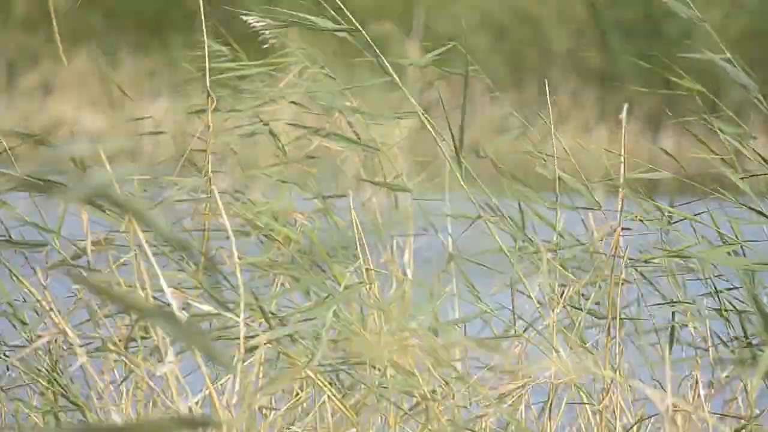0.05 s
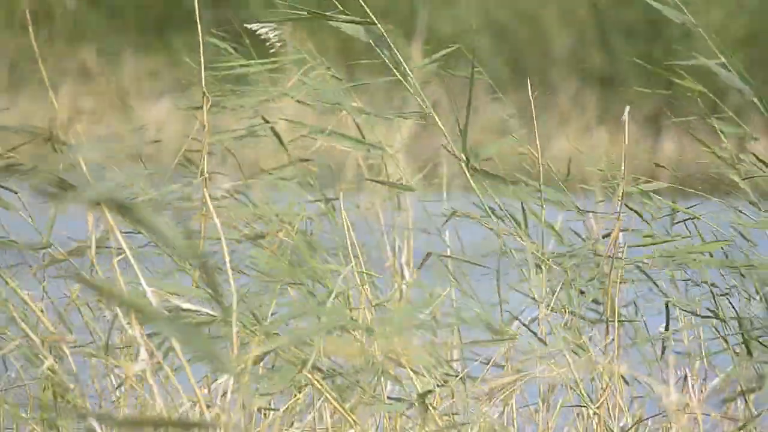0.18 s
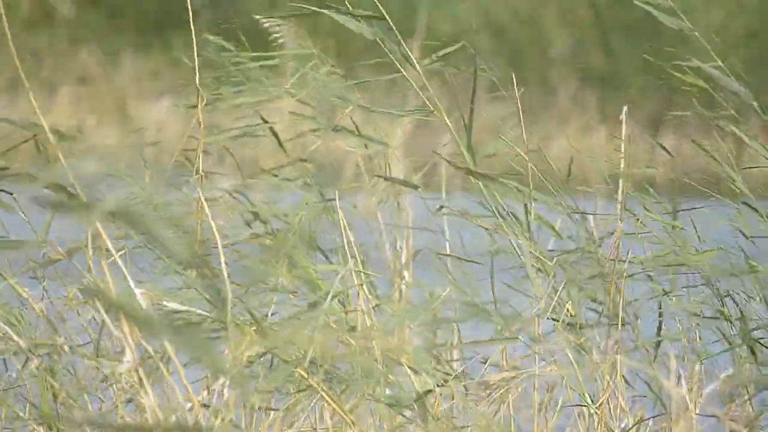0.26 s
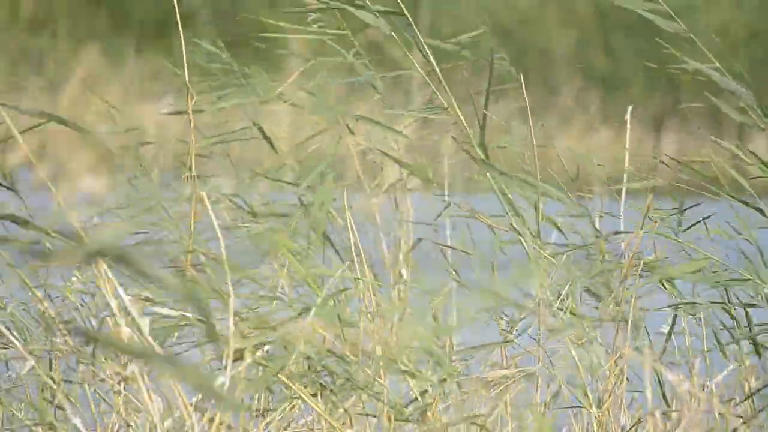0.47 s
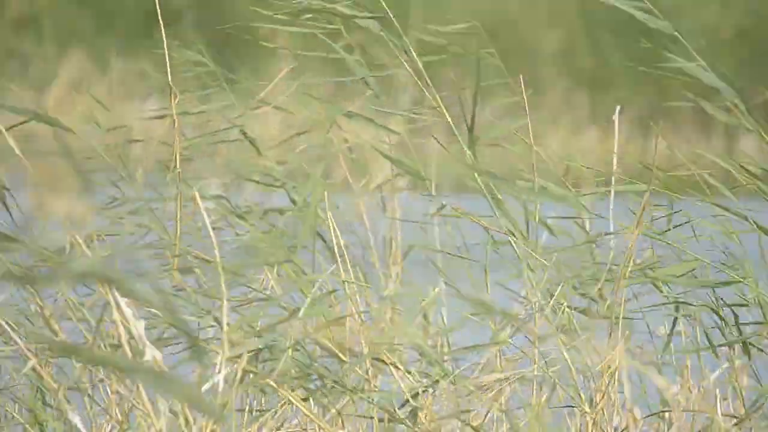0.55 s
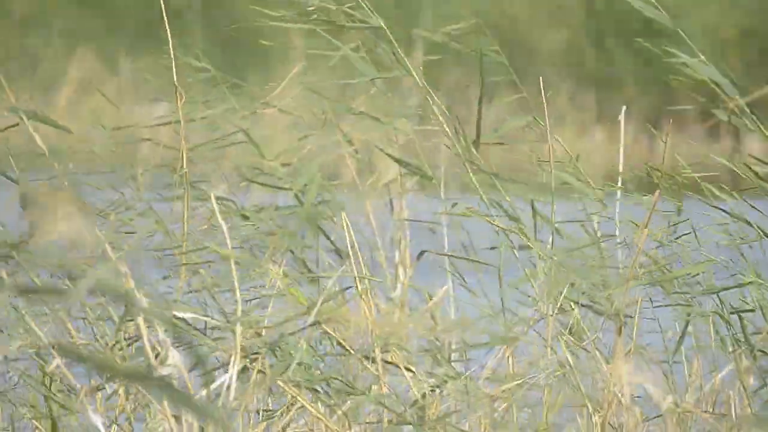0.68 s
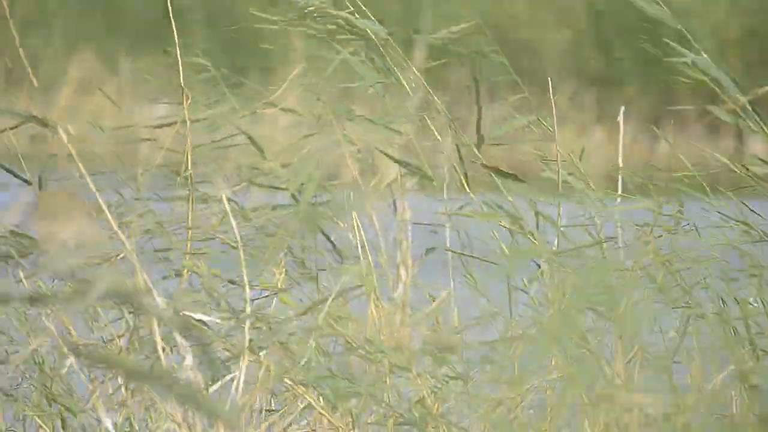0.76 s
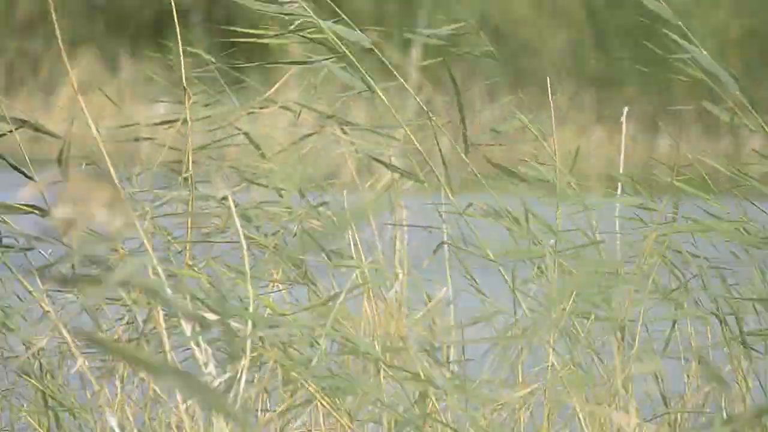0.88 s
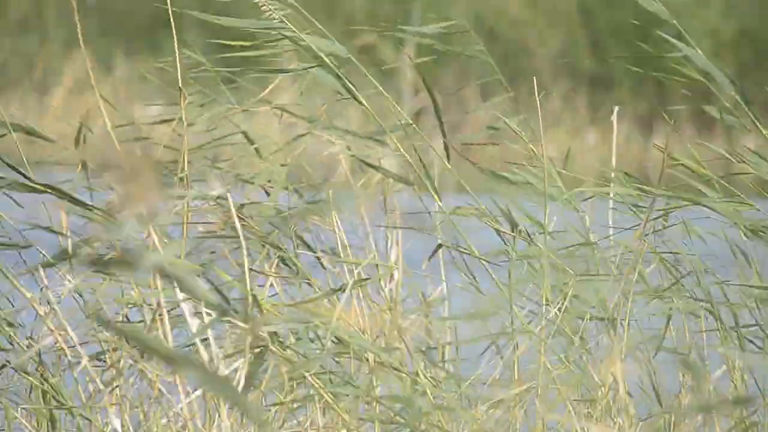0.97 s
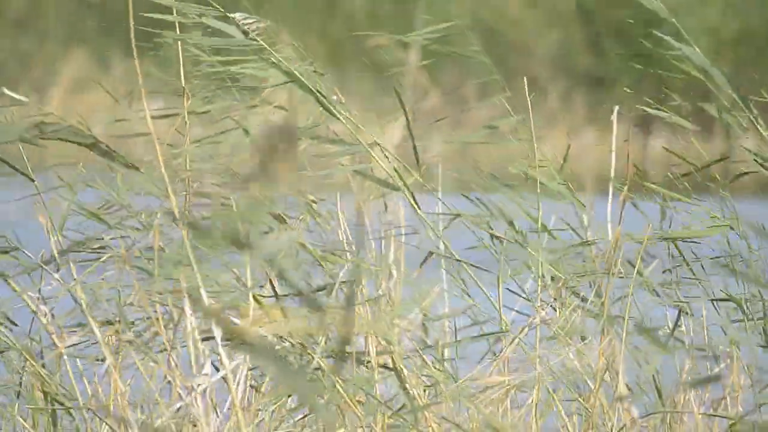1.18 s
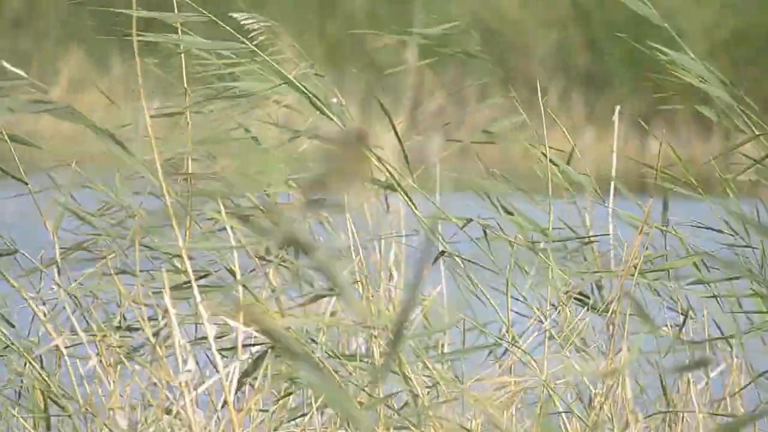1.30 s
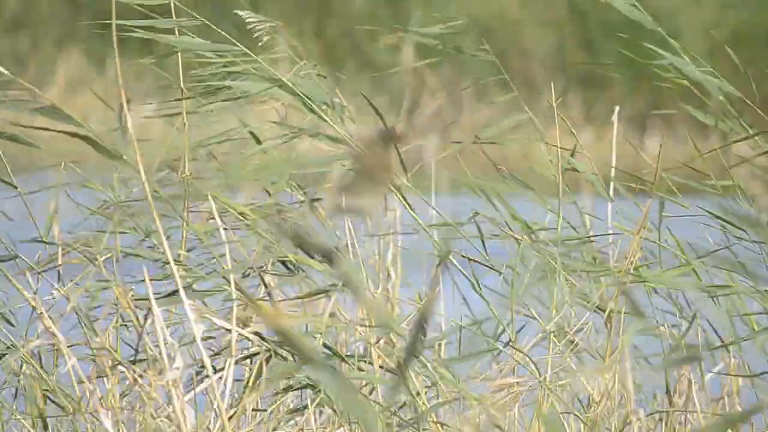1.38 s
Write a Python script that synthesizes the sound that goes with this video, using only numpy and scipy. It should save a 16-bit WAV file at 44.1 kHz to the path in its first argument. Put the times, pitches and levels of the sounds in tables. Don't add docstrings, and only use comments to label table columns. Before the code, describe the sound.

Outdoor reed bed in wind, close unshielded microphone: soft leaf hiss swells with dry swishes and flicks, low buffeting peaks early, then scattered puffs and brushes continue over a faint distant wash.

```python
import sys
import numpy as np
from scipy import signal
from scipy.io import wavfile
from scipy.ndimage import uniform_filter1d

SR = 44100
rng = np.random.default_rng(int(sys.argv[2]) if len(sys.argv) > 2 else 0)


def volts(x):
    e = np.asarray(x, float) / 20
    return 10 ** e


def log_audio(samples):
    frames = np.atleast_2d(samples).T
    limited = np.clip(frames, -1, 1)
    pcm = np.round(limited * 32767).astype(np.int16)
    wavfile.write(sys.argv[1], SR, pcm)


N = 63945

# (time [s], depth [dB], width [ms])
EDDIES = [(0.2791, -38.6, 2.3), (0.3029, -38.7, 1.4), (0.3381, -37.4, 1.0), (0.3727, -38.4, 2.8),
          (0.3772, -39.4, 1.0), (0.4264, -35.5, 1.8), (0.4921, -32.3, 1.8), (0.504, -19.3, 1.15),
          (0.5097, -27.3, 2.5), (0.5185, -26.3, 2.4), (0.5261, -30.1, 1.5), (0.5346, -30.3, 1.1),
          (0.5377, -32.6, 1.9), (0.5442, -30.6, 1.7), (0.5522, -28.5, 2.7), (0.5579, -27, 1.2),
          (0.56, -27, 0.9), (0.5606, -29, 2.0), (0.5635, -39, 1.0), (0.5668, -35, 3.2),
          (0.8084, -39.6, 2.1), (0.828, -36, 2.2), (0.9363, -42, 1.0), (0.9389, -31, 1.2),
          (0.944, -33.9, 2.0), (1.0018, -33, 2.6), (1.0404, -33, 1.6), (1.0682, -32.5, 2.7),
          (1.107, -39.1, 3.2), (1.266, -33, 1.5), (1.2719, -37, 1.9), (1.2829, -34, 1.6),
          (.1481, -45, 2.2), (.1723, -42, 4.5), (.1836, -44.5, 3.2), (.224, -42, 1.9),
                 (.2311, -40.3, 2.5), (.245, -43, 1.7), (.2514, -43.5, 1.3), (.259, -41.5, 1.6),
                 (.2624, -40.5, 2.5), (.291, -41.6, 3.8), (.3409, -45, 1.3), (.3451, -46, 1.3),
                 (.3501, -44.3, 1.5), (.3945, -41.5, 1.8), (.4223, -40, 2.2), (.4333, -43.3, 2.8),
                 (.464, -40.5, 1.5), (.4672, -41.3, 1.4), (.4729, -41, 2.4), (.48, -35.8, 3.2),
                 (.4874, -39, 2.2), (.4981, -38, 2.4), (.5135, -36, 1.8), (.532, -37.4, 1.0),
                 (.5413, -39, 1.5), (.5758, -40, 1.1), (.581, -36, 2.2), (.584, -42.7, 1.6),
                 (.6696, -45, 1.3), (.6732, -42, 2.8), (.6819, -42.7, 3.4), (.7956, -44, 2.8),
                 (.8231, -43, 2.4), (.8369, -43.5, 2.6), (.8917, -40, 2.1), (.9483, -39, 3.0),
                 (1.0283, -40.2, 2.4), (1.0345, -43.3, 1.9), (1.0451, -42.6, 1.8), (1.0584, -43, 2.3),
                 (1.1129, -41.6, 3.3), (1.1373, -42, 1.2), (1.1422, -44, 2.8), (1.1591, -42.5, 3.0),
                 (1.1777, -41.7, 1.7), (1.1823, -43.8, 1.0), (1.2264, -43, 2.9), (1.2689, -39, 1.3),
                 (1.2766, -38, 1.9), (1.2797, -42, 1.4), (1.2863, -38.4, 3.0), (1.3193, -47, 3.3),
                 (1.3687, -45, 5), (1.3844, -41.6, 2.0), (1.4, -42.2, 1.7), (1.4178, -44.6, 3.5)]
# (time [s], level [dB])
GUST = [(0.0, -62), (0.07, -66), (0.14, -63.5), (0.2, -51), (0.33, -50), (0.416, -51), (0.6, -54.5),
        (0.72, -57), (0.81, -54.5), (0.9, -56.5), (1.106, -54.5), (1.45, -55)]
# (time [s], level [dB], half length [s], flutter pitch [Hz])
SURGES = [(.015, -56, 0.013, 190), (0.076, -47.5, 0.0071, 202), (.162, -45.5, 0.0084, 112),
          (.232, -52, 0.014, 174), (0.261, -46, 0.027, 148), (0.296, -49.5, 0.027, 224),
          (.466, -48.5, 0.0073, 298), (.482, -46, 0.0087, 158), (.515, -32, 0.0049, 200),
          (.553, -29.5, 0.0068, 142), (.552, -43.5, 0.0025, 800), (0.579, -39, 0.0027, 205),
          (.6, -58, 0.012, 106), (0.673, -52, 0.004, 183), (.63, -50, 0.011, 120), (.793, -61, 0.0062, 182),
          (0.889, -48, 0.0049, 132), (.949, -50, 0.0039, 202), (.975, -59, 0.0065, 100),
          (1.032, -42.5, 0.0094, 261), (1.062, -57, 0.0027, 144), (1.138, -47.5, 0.0033, 250),
          (1.159, -49, 0.0078, 170), (1.181, -45, 0.0025, 292), (1.227, -43.5, 0.0027, 162),
          (1.278, -41, 0.0073, 297), (1.32, -45, 0.0029, 133), (1.365, -59, 0.018, 81),
          (1.391, -48, 0.016, 266), (1.423, -49, 0.0091, 172)]
# (time [s], level [dB], centre [Hz])
SWISHES = [(0.041, -58, 3750), (0.082, -71, 6200.0), (0.153, -53, 7000), (0.184, -50, 4700),
           (0.257, -49.5, 5530), (0.29, -46, 6160), (0.31, -47.5, 4180), (0.337, -45.5, 4060),
           (0.366, -43.5, 5500), (0.413, -51, 4300.0), (0.431, -60, 5070), (0.516, -44, 5840),
           (0.583, -45, 5170), (0.647, -50, 3960), (0.691, -57, 5300.0), (0.751, -47.5, 4680),
           (0.778, -51.5, 4000), (0.797, -55, 2300), (0.829, -50, 4900), (0.914, -55.5, 5100.0),
           (0.973, -55, 4200.0), (1.013, -52.5, 3470), (1.071, -52, 4350), (1.084, -52.5, 3600),
           (1.133, -48, 5370), (1.187, -49, 4530), (1.203, -50, 4800), (1.282, -59, 6140),
           (1.346, -61, 5100.0), (1.424, -50, 2400)]
# (time [s], level [dB], centre [Hz])
FLICKS = [(.081, -50.5, 10700), (.154, -50.5, 10000), (0.221, -48, 10600), (.254, -48, 9500),
          (.262, -43, 9850), (.29, -43, 11000), (0.363, -46, 9500), (.374, -43, 10800), (.381, -47, 9300),
          (.414, -48, 4370), (.43, -46.5, 6940), (.442, -61, 7160), (.485, -48, 2360), (.647, -56, 4080),
          (0.859, -49, 10000), (1.084, -50, 2260), (1.133, -52, 5800), (1.189, -50.5, 2860),
          (1.19, -52.5, 5830), (1.201, -56, 2960), (1.212, -53, 5170), (1.132, -56, 2460),
          (.483, -48, 7100), (.485, -54.5, 3660), (.492, -49.5, 5670), (0.236, -51, 6600), (.31, -60, 9500),
          (.395, -50, 10000), (0.464, -66, 5800), (.508, -47.5, 9800), (.617, -50, 9600),
          (0.339, -52.5, 2570), (.778, -54, 5700), (.828, -58, 6800), (1.084, -56, 5700),
          (1.205, -53, 5600), (1.28, -54, 9300)]
# (time [s], level [dB])
SWAY = [
    (0.0, -55),
    (0.152, -53.5),
    (0.25, -47.5),
    (0.402, -47),
    (0.476, -45),
    (0.836, -51),
    (1.45, -52),
]
# (frequency [Hz], level per Hz [dB])
LEAF_COLOUR = [
    (600, -3.5),
    (1170, -3),
    (2600, 3.5),
    (4500, -0.5),
    (7100, 1.5),
    (9100, 1),
    (11000, 1.5),
    (13000, -0.5),
]


def rms_one(x):
    return x / np.sqrt(np.mean(x ** 2) + 1e-20)


def in_time(rows):
    s, db = np.transpose(rows)
    return np.interp(np.arange(N) / SR, s, db)


def band(x, low_hz, high_hz):
    edges = [low_hz, min(high_hz, 0.45 * SR)]
    return signal.sosfilt(signal.butter(2, edges, "band", fs=SR, output="sos"), x)


def drift(rate_hz):
    r = np.exp(-80 * np.pi * rate_hz / SR)
    noise = rng.standard_normal(N // 40 + 2002)
    slow = signal.lfilter([1], [1, -2 * r, r * r], noise)[2000:]
    return np.interp(np.arange(N) / 40, np.arange(len(slow)), rms_one(slow))


def grains(per_s, spread_db):
    size = volts(spread_db * np.minimum(rng.exponential(1, N), 4))
    return size * (rng.random(N) < per_s / SR)


def eddy(width_ms):
    u = np.arange(-400, 401) / SR * 1000 / width_ms
    core = 1 / np.cosh(2.31 * u)
    rise = np.exp(-0.5 * (u / 0.96) ** 2)
    shape = rise * core.sum() / rise.sum() - core
    return shape / -shape.min()


def vent(x):
    w, damping = 2 * np.pi * 55, 0.8
    return signal.lfilter(*signal.bilinear([1, 0, 0], [1, 2 * damping * w, w * w], SR), x)


def buffeting():
    strong = np.zeros(N + 801)
    for s, db, width_ms in EDDIES:
        start = int(s * SR)
        strong[start:start + 801] += volts(db + 1.52) * eddy(width_ms)
    small_per_s, small_ms = 500, 1.58
    small = 0
    for size in (0.6, 1.05, 1.7):
        small = small + signal.fftconvolve(grains(small_per_s / 3, 1.5), eddy(small_ms * size), "same")
    rumble = volts(-7) * rms_one(band(rng.standard_normal(N), 37.7, 81))
    return vent(strong[400:N + 400]) + volts(in_time(GUST)) * (rms_one(vent(small)) + rumble)


def surges():
    octaves, surge_db = 0.61, -4.5
    spray_db, full_spray_db = -14.5, -41.5
    out = np.zeros(N + 8000)
    t = np.arange(-4000, 4000) / SR
    for s, db, half_s, hz in SURGES:
        low, high = rng.standard_normal((2, len(t)))
        edges = hz / 2 ** octaves, hz * 2 ** octaves
        flutter = band(band(low, *edges), *edges)
        flutter = flutter / np.sqrt(uniform_filter1d(flutter ** 2, size=400) + 1e-12)
        spray = volts(spray_db + min(db - full_spray_db, 0)) * rms_one(band(high, 493, 1000))
        swell = np.exp(-0.5 * (t / half_s) ** 2)
        start = int(s * SR)
        out[start:start + len(t)] += volts(db + surge_db) * swell * (flutter + spray)
    return out[4000:N + 4000]


def swishes():
    rise_s, fall_s, grain_db, swish_db = 0.0031, 0.0025, 3, 1.0
    out = np.zeros(N + 2000)
    t = np.arange(-1000, 1000) / SR
    swell = np.exp(-0.5 * (t / np.where(t < 0, rise_s, fall_s)) ** 2)
    for rows, octaves in ((SWISHES, 0.9), (FLICKS, 0.18)):
        for s, db, hz in rows:
            noise, lumps = rng.standard_normal((2, len(t)))
            crackle = noise * volts(grain_db * rms_one(uniform_filter1d(lumps, size=30)))
            burst = swell * band(crackle, hz / 2 ** octaves, hz * 2 ** octaves)
            burst = burst * np.sqrt(np.sum(swell ** 2) / np.sum(burst ** 2))
            start = int(s * SR)
            out[start:start + len(t)] += volts(db + swish_db) * burst
    return out[1000:N + 1000]


def leaf_db(hz):
    points, db = np.transpose(LEAF_COLOUR)
    return np.interp(np.log(hz), np.log(points), db)


def leaf_hiss(together_db, own_db):
    edges = 560 * 2 ** (np.arange(15) / 3)
    white = rng.standard_normal((2, N))
    together = drift(19.3)
    out = 0
    for k, (low, high) in enumerate(zip(edges, edges[1:])):
        flicker_db = together_db * together + own_db * drift(10.5)
        level = volts(leaf_db(np.sqrt(low * high)) + flicker_db)
        out = out + level * band(white[k % 2], low, high)
    return rms_one(out)


def leaf_ticks():
    ticks_per_s, ring_cycles = 2500, 4.9
    clicks = grains(ticks_per_s * volts(6 * drift(30)), 3) * rng.choice([-1, 1], N)
    dealt = rng.integers(0, 20, N)
    out = 0
    for k, hz in enumerate(np.geomspace(1800, 10500, 20)):
        r = volts(-60 * hz / (ring_cycles * SR))
        w = 2 * np.pi * hz / SR
        struck = clicks * (dealt == k) + 1e-18
        ring = signal.lfilter([0, np.sin(w)], [1, -2 * r * np.cos(w), r * r], struck)
        out = out + volts(leaf_db(hz)) * np.sqrt(hz) * ring
    return rms_one(out)


def reeds():
    return volts(in_time(SWAY)) * (leaf_hiss(together_db=1.1, own_db=1.8) + volts(-6) * leaf_ticks())


def far_wash():
    sway_db = in_time(SWAY)
    level_db = -60 + 0.27 * (sway_db - sway_db.mean())
    return volts(level_db) * rms_one(band(rng.standard_normal(N), 326, 1780))


def scene():
    return (buffeting() + surges() + swishes() + reeds() + far_wash())[None]


def band_limit(x):
    return signal.sosfilt(signal.butter(12, 13650, fs=SR, output="sos"), x)


def record(dry):
    dip_hz, dip_width_hz, dip_depth = 7900, 700, 0.65
    x = dry - dip_depth * signal.lfilter(*signal.iirpeak(dip_hz, dip_hz / dip_width_hz, SR), dry)
    x = signal.sosfilt(signal.cheby2(6, 33, 11750, fs=SR, output="sos"), x)
    x = signal.sosfilt(signal.cheby2(16, 50, 13800, fs=SR, output="sos"), x)
    return band_limit(x)


dry = scene()
out = record(dry)
log_audio(out)
```